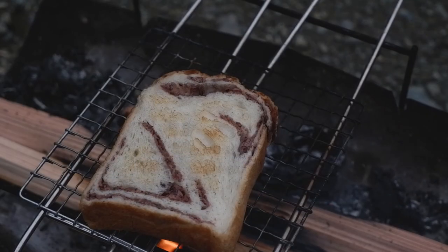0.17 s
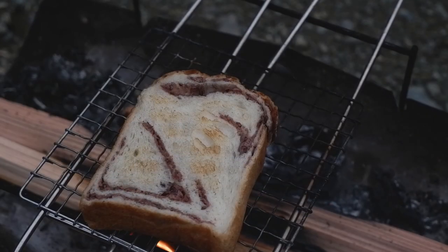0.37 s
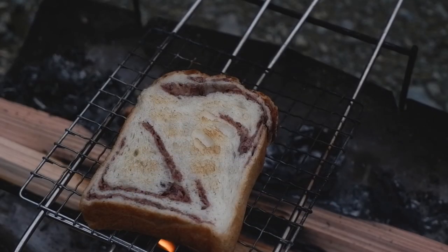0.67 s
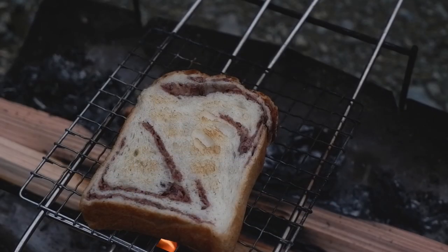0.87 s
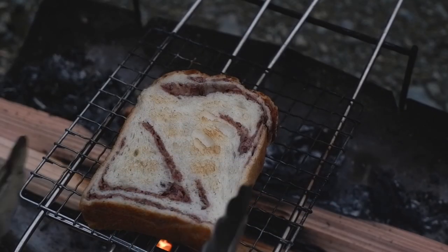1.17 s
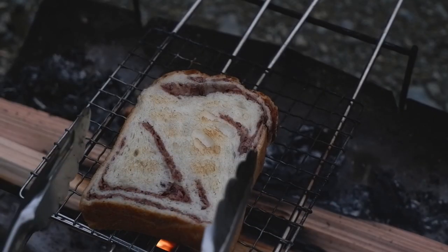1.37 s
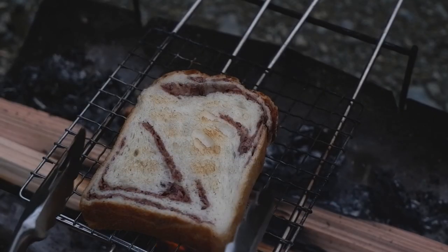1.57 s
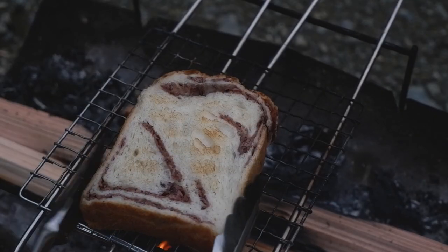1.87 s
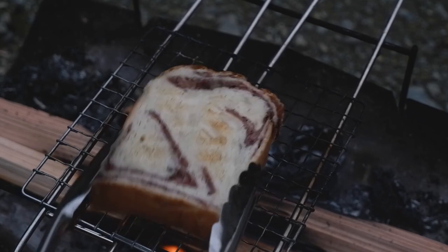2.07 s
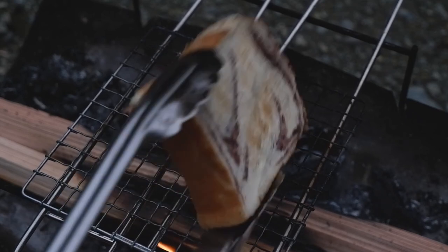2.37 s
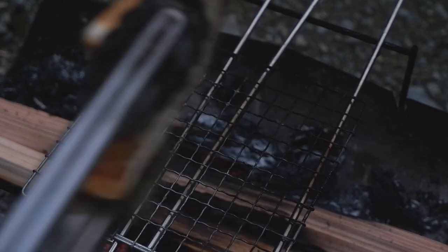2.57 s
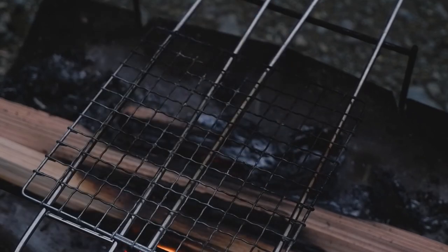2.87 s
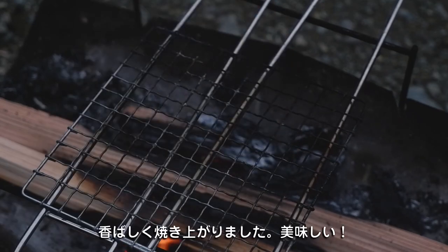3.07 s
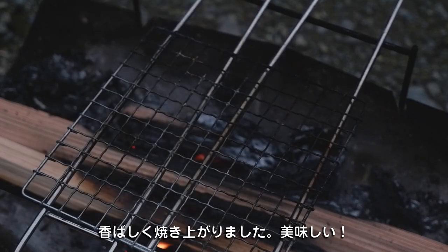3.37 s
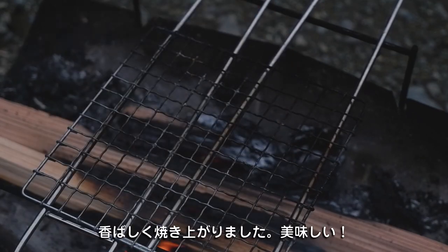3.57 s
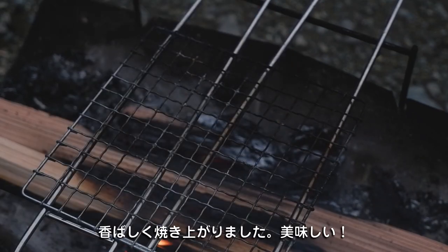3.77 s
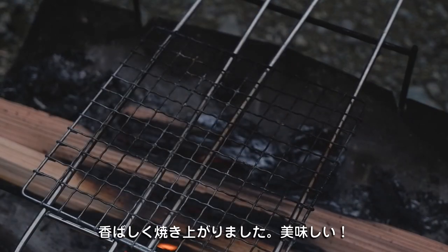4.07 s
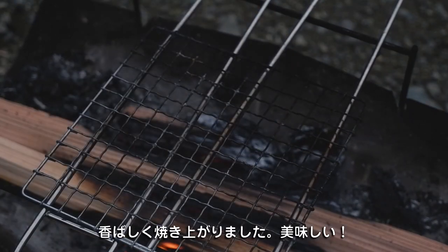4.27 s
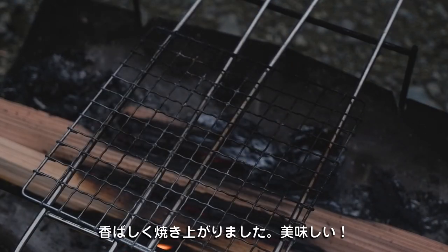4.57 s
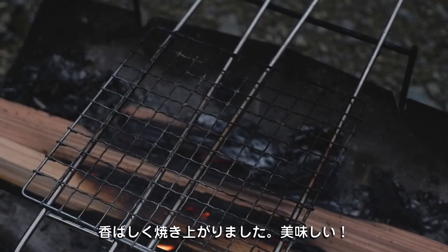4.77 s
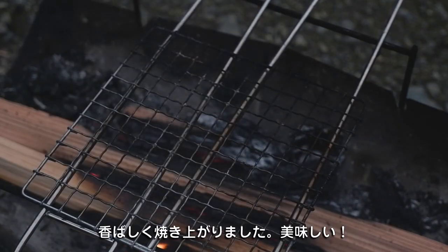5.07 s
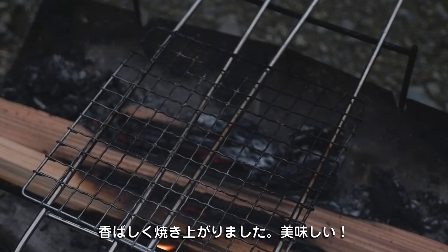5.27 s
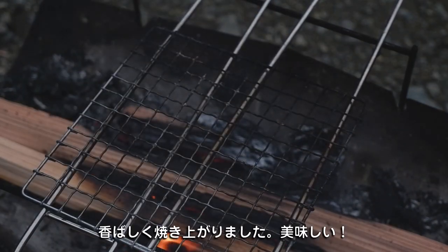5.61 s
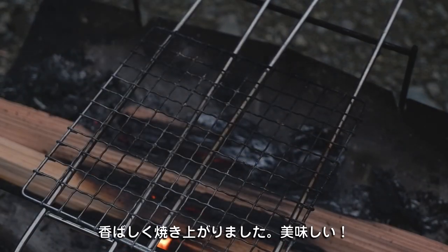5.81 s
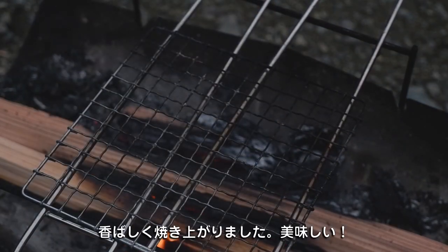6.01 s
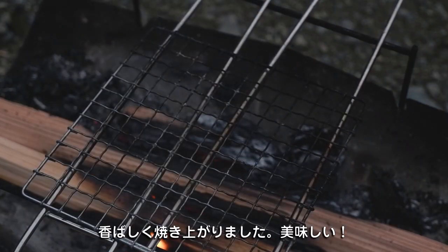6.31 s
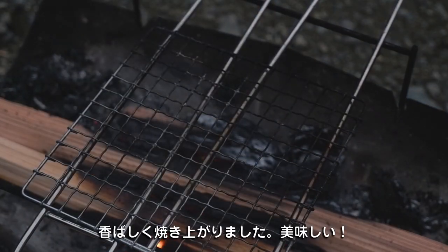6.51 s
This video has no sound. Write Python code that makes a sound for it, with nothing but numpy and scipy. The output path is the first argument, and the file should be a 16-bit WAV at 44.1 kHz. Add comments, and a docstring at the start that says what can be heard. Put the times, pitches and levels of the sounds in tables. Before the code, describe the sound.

Beside a campfire grill, metal tongs rattle lightly, one clink standing out, then leave a quiet gap with soft wood pops. A hard snap, a faint drag of bread crust on the grid and two more snaps come in the middle. The rest is sparse: muffled pops, dry ticks and faint metal taps. Distant water murmurs steadily beneath, with short outdoor echoes and slight hiss.

```python
"""A charcoal fire outdoors, bread toasting over it: three hard cracks, small ember ticks, soft pops in the wood.
Steel tongs clink and their arms rub, noise driving the modes of the steel; the crust drags over wire mesh.
Far off a stream murmurs, built from patchy noise bands. Cracks, ticks and clinks bring short ground echoes.
The stereo microphone's gain ducks after loud peaks, its input saturates and its band is limited."""
import sys
import numpy as np
from scipy import signal
from scipy.fft import rfft, irfft, next_fast_len
from scipy.io import wavfile
from scipy.ndimage import uniform_filter1d, map_coordinates

SR = 44100
rng = np.random.default_rng(int(sys.argv[2]) if len(sys.argv) > 2 else 0)


def dump(signal):
    """Clip the signal to [-1, 1] and save it as 16-bit WAV at the path in sys.argv[1]."""
    limited = np.clip(np.atleast_2d(signal).T, -1, 1)
    pcm = np.round(limited * 32767).astype(np.int16)
    wavfile.write(sys.argv[1], SR, pcm)


N = 293118


def amp(db):
    """Decibels to gain."""
    return 10 ** (np.asarray(db) / 20)


def unit(x):
    """Scaled to rms 1."""
    return x / np.sqrt(np.mean(x ** 2) + 1e-20)


def along(points, hz):
    """(Hz, value) points read on a log frequency axis."""
    f, v = np.transpose(points)
    return np.interp(np.log(hz + 1), np.log(f + 1), v)


def curves(rows):
    """One value per sample for each column after the time."""
    s, *columns = np.transpose(rows)
    return [np.interp(np.arange(N) / SR, s, column) for column in columns]


def drift(rate):
    """A smooth random curve, rate knots a second."""
    knots = rng.standard_normal(int(N * rate / SR) + 4)
    return map_coordinates(knots, [np.arange(N) * rate / SR])


def swell(t, rise_ms, fall_ms):
    """An exponential rise and fall that peaks at 1 when t = 0; both times are time constants."""
    return np.exp(np.where(t < 0, 1000 * t / rise_ms, -1000 * t / fall_ms))


def filtered(x, response):
    """x times a complex response of frequency."""
    m = next_fast_len(x.shape[-1] + 8192)
    return irfft(rfft(x, m) * response(np.fft.rfftfreq(m, 1 / SR)), m)[..., :x.shape[-1]]


def body(modes):
    """Causal response of parallel resonances (Hz, width Hz, dB) with alternating signs."""
    def response(f):
        total = 0
        for k, (centre, width, db) in enumerate(modes):
            damping = 1j * f * width
            total = total + (-1) ** k * amp(db) * damping / (centre * centre - f * f + damping)
        return total
    return response


def add(track, s, sound, start=0):
    """Mixes in a sound whose first sample lies start seconds from s."""
    i = round((s + start) * SR)
    part = track[..., max(i, 0):][..., :sound.shape[-1] + min(i, 0)]
    part += sound[..., max(-i, 0):][..., :part.shape[-1]]


def rush(spectrum, patchy_db, size):
    """Unrelated left and right noise of rms 1 with shared patches of random gain, smoothed over size frames."""
    z = signal.stft(rng.standard_normal((2, N)), nperseg=1024)[2]
    field = uniform_filter1d(rng.standard_normal(z.shape[1:]), size=3, axis=0)
    field = uniform_filter1d(field, size=size, axis=1)
    pair = signal.istft(z * amp(patchy_db * unit(field)), nperseg=1024)[1][:, :N]
    return unit(filtered(pair, lambda hz: amp(along(spectrum, hz))))


# echoes off stones and gear: (frequency [Hz], time to fall 60 dB [s])
GROUND = [(300, 0.053), (2500, 0.098), (8000, 0.12), (15000, 0.088)]


def echoes():
    """A fresh stereo noise tail, 8.1 ms behind the direct sound; each frequency dies at its own speed."""
    hz, t, z = signal.stft(rng.standard_normal((2, SR // 4)), SR, nperseg=256)
    fading = z * amp(-60 * t / along(GROUND, hz)[:, None])
    tail = signal.istft(fading, SR, nperseg=256)[1]
    return np.pad(tail / np.linalg.norm(tail[0]), ((0, 0), (round(0.0081 * SR), 0)))


def outdoors(sound, wet_db):
    """The direct sound followed by its echoes."""
    wet = amp(wet_db) * signal.fftconvolve(sound, echoes(), axes=1)
    return wet + np.pad(sound, ((0, 0), (0, wet.shape[1] - sound.shape[1])))


# far stream over time: (time [s], rms level of the murmur [dB], rms level of the rumble [dB])
STREAM = [(0.0, -58.5, -65.5), (0.37, -58, -64.5), (0.7, -60.5, -62.5), (1.05, -59, -61), (1.61, -59, -67),
          (2.41, -57, -66), (2.78, -64, -66), (3.24, -56, -61.5), (3.46, -59.5, -64), (3.91, -56.5, -65),
          (4.33, -62.5, -61), (4.46, -60, -63), (5.54, -57.5, -63), (5.83, -59, -69.5), (6.65, -59.5, -60)]
# colours of the water's layers, each made rms 1 afterwards: (frequency [Hz], relative level [dB])
RUMBLE = [(18, -51), (30, -72.5), (75, -19), (144, -0.5), (225, 1), (275, 1), (335, 1.5), (367, 0),
          (700, -10.5), (910, -32), (1540, -120)]
MURMUR = [(320, -12), (550, -5.5), (706, -4), (875, -4), (1030, -0.5), (1170, -3), (1330, -15), (1600, -28),
          (2080, -45), (3520, -120)]
SPLASH = [(820, -12), (1400, -4), (1560, -5.5), (1860, -5.5), (2110, -6), (3020, -6), (3450, -7.5),
          (4140, -12), (6000, -17.5), (7800, -20.5), (13200, -120)]
HISS = [(2650, -50.5), (4500, -26.5), (8110, -6), (8600, -6.5), (9820, -6.5), (15100, -5.5), (16000, -8.5)]  # the input hiss in record() has this colour too
SPLASH_DB, DRIFT_DB = -60, 0.57  # steady level of the splash; depth of its slow drift
HISS_DB = -71
RUMBLE_PATCHY_DB, MURMUR_PATCHY_DB = 5.5, 4.3  # depth of the lumps in the water


def stream():
    """Far water: lumpy rumble, a hollow murmur near 1 kHz and splash, over a smoother hiss."""
    murmur_db, rumble_db = curves(STREAM)
    splash_db = SPLASH_DB + DRIFT_DB * drift(2.97)
    rumble = amp(rumble_db) * rush(RUMBLE, patchy_db=RUMBLE_PATCHY_DB, size=6)
    murmur = amp(murmur_db) * rush(MURMUR, patchy_db=MURMUR_PATCHY_DB, size=4)
    splash = amp(splash_db) * rush(SPLASH, patchy_db=4.0, size=4)
    hiss = amp(HISS_DB) * rush(HISS, patchy_db=-1.0, size=4)
    return rumble + murmur + splash + hiss


# colour of crust on mesh, made rms 1 afterwards: (frequency [Hz], relative level [dB])
CRUST = [(880, -36), (1500, -11), (1850, -5), (3120, -3), (7920, -16.5), (13800, -17), (16000, -16)]
SCRAPE_S, SCRAPE_DB, SCRAPE_RISE_MS, SCRAPE_HOLD_S, SCRAPE_FALL_MS = 2.188, -58.5, 28, 0.14, 60


def lift():
    """The crust drags once over the wire mesh in uneven grains of noise."""
    t = np.arange(N) / SR - SCRAPE_S
    held_t = t - np.clip(t, 0, SCRAPE_HOLD_S)  # stays at the peak during the hold
    stroke = swell(held_t, SCRAPE_RISE_MS, SCRAPE_FALL_MS)
    grains = amp(3.7 * unit(uniform_filter1d(rng.standard_normal(N), size=300)))
    return amp(SCRAPE_DB) * stroke * unit(grains * rush(CRUST, patchy_db=-1.5, size=2))


# modes of the tongs' steel, before grip damping; tongs() plays them too:
# (frequency [Hz], width [Hz], relative level [dB])
STEEL = [(2400, 37, -4), (2780, 50, -12), (3250, 110, -2), (3830, 39, -2), (4120, 35, -4), (4390, 62, -7),
         (4660, 50, -7), (4870, 40, -5), (5290, 45, -9), (5500, 58, -8), (5890, 30, -9), (6150, 40, -7),
         (6530, 33, -8), (6920, 83, -7), (7260, 52, -9), (7500, 77, -10), (8210, 34, -9), (8410, 79, -11),
         (8900, 60, -14)]
SLIDE_DB, SLIDE_END_S, SLIDE_FALL_MS = -61, 0.42, 69  # the arms rub until the grip settles
SLIDE_GRIT_DB = 5  # unevenness of the rubbing


def rubbing():
    """Early on the arms slide on each other: uneven grit through the damped steel."""
    stroke = swell(np.maximum(np.arange(N) / SR - SLIDE_END_S, 0), 1, SLIDE_FALL_MS)
    hz, width, level = np.transpose(STEEL)
    unevenness = unit(uniform_filter1d(rng.standard_normal(N), size=400))
    grit = amp(SLIDE_GRIT_DB * unevenness) * rng.standard_normal((2, N))
    modes = body(np.transpose([hz, width + 90, level]))
    steel = lambda f: modes(f) / (1 + (2100 / (f + 1)) ** 8) / (1 + (f / 7000) ** 4)
    return amp(SLIDE_DB) * stroke * unit(filtered(grit, steel))


# tongs clinks: (time [s], level of the loudest 3 ms before echoes [dB], tip ring [dB], treble [dB],
# favoured pitch [Hz], fall of the noise burst [ms])
CLINKS = [(0.0265, -40.5, -1, 7, 5000, 2.7), (0.073, -44.5, 13, 5.5, 6300, 12),
          (0.143, -34.5, 16, 11, 4150, 8.7), (0.161, -43.5, 17, 9, 4150, 4.5),
          (.187, -40, 6, -6, 4170, 2.9), (0.2128, -48.5, 16, 1, 3900, 6.3), (.237, -47, 14, 8, 4000, 3.9),
          (0.285, -52, 15, -5, 3570, 3.3), (0.3178, -33, 12, -0.5, 2970, 6.4),
          (0.357, -47, 22, 0, 2900, 2.8), (0.378, -44.5, -5, 1, 3230, 3.8),
          (0.392, -22, 3.5, -0.5, 3330, 4.5), (0.4082, -46, 17, -13, 3250, 3.4),
          (0.6035, -40, -12, -4, 3250, 1.7), (2.1402, -50, 7, 7.5, 5000, 2.9),
          (4.36, -46, 10, 2.5, 5150, 7.1), (4.605, -48, -3, 5, 3500, 15), (4.6896, -44, 9, 9, 4120, 16),
          (4.708, -52, 1, -4, 3960, 5), (4.83, -49.5, 18.5, 6.5, 4200, 12),
          (5.273, -43, -10, -3, 4000, 9.5), (5.294, -51.5, -1, 10, 3250, 9.7)]
BURST_RISE_MS, EDGE_DB = 3.9, -37.5  # rise of the noise burst; a clink's sharp edge relative to the treble


def tongs():
    """Each clink is a short noise burst that drives the steel's modes, most near its favoured pitch."""
    out, t = np.zeros((2, N)), np.arange(SR // 6) / SR - .02
    hz, width, level = np.transpose(STEEL)
    for s, db, tip_db, treble_db, near_hz, fall_ms in CLINKS:
        favour = -11 * np.tanh(np.abs(np.log(hz / near_hz)) / 0.065)
        tilt = np.select([hz < 2600, hz > 5000], [tip_db, treble_db])
        scatter = rng.normal(0, 2.5, hz.shape)
        size = level + favour + tilt + scatter
        envelope = swell(t, BURST_RISE_MS, fall_ms) + 0.6 * swell(t, 0.75, 0.13)  # a sharp core inside the burst
        noise = envelope * rng.standard_normal(len(t))
        # a random delay between left and right widens the clink, in samples
        shift = round(rng.choice([-1, 1]) * rng.uniform(50, 110))
        burst = np.array([noise, np.roll(noise, shift)])
        held = np.where(hz < 2600, 28, width + 45)  # the grip damps all but the tip
        ring = filtered(burst, body(np.transpose([hz, held, size])))
        clank = filtered(burst, body(np.transpose([hz, 6 * width, size - 9])))
        sound = filtered(ring + clank, lambda f: 1 / (1 + (2100 / (f + 1)) ** 8) / (1 + (f / 9000) ** 6))
        edge = filtered(burst, body([(9350, 640, 10), (13300, 1200, 2.0)]))  # the clink's sharp edge
        sound = sound + amp(treble_db + EDGE_DB) * edge
        power = uniform_filter1d(np.mean(sound ** 2, axis=0), size=130)
        sound = sound / np.sqrt(np.max(power))
        add(out, s, amp(db) * outdoors(sound, wet_db=-17), t[0] + 0.0015)
    return out


# soft hollow pops in the log: (time [s], level before the envelope [dB], pitch [Hz])
POPS = [(0.284, -32.5, 1050), (0.427, -29, 1070), (0.524, -34, 1020), (1.074, -32, 980), (1.278, -38, 1084),
        (3.035, -37, 967), (2.338, -35.5, 695), (3.067, -36, 760), (3.519, -31, 1070), (3.652, -34.5, 905),
        (3.754, -34.5, 990), (3.783, -37, 1000), (3.839, -35.5, 1020), (3.944, -34, 965), (4.113, -36, 883),
        (4.496, -34, 1020), (4.897, -37.5, 990)]
FAINT_POP_DB, FAINT_POP_HZ = -38.5, 950  # centre level and base pitch of more pops at random times


def pops(count=18):
    """Gas pockets burst inside the wood: soft, fast-dying sines, their phase unequal left and right."""
    out, t = np.zeros((2, N)), np.arange(SR // 10) / SR
    when, size, tone = rng.random((count, 3)).T
    faint_db = FAINT_POP_DB + 6 * (size - .5)
    faint_hz = FAINT_POP_HZ * (0.78 + 0.426 * tone)
    faint = np.transpose([when * N / SR, faint_db, faint_hz])
    for s, db, hz in [*POPS, *faint]:
        phase = 2 * np.pi * hz * t + rng.uniform(0, 2.2, (2, 1))
        onset = 1 - np.exp(-t / 0.0028)
        add(out, s, amp(db - 60 * t / 0.019) * onset * np.sin(phase))
    return out


# ember ticks: (time [s], peak level before echoes [dB], pitch [Hz], fall [ms])
TICKS = [(0.525, -44.5, 2780, 7.6), (1.5322, -18.5, 3560, 1.6), (1.811, -53, 2270, 5.1),
         (1.876, -49, 2510, 4), (2.005, -54, 5240, 6.2), (2.5294, -54, 5430, 6), (2.897, -51, 6700, 1.3),
         (3.177, -48.5, 3230, 30), (3.65, -40.5, 2920, 5.9), (4.134, -46.5, 2700, 8),
         (4.896, -50, 2640, 4.4), (5.339, -57, 6100, 20), (6.163, -53.5, 7900, 4.3),
         (6.272, -56.5, 8260, 6), (6.389, -56, 8300, 4), (6.587, -40, 5850, 9.7)]
TICK_RISE_MS, TICK_WIDTH_HZ = 3.8, 4300  # longest rise; width of a 1 ms tick, longer ones are narrower


def embers():
    """Small ticks: a puff of noise in one short, steep resonance."""
    out, t = np.zeros((2, N)), np.arange(SR // 12) / SR - .01
    for s, db, hz, fall_ms in TICKS:
        puff = swell(t, min(TICK_RISE_MS, fall_ms), fall_ms) * rng.standard_normal((2, len(t)))
        resonance = body([(hz, TICK_WIDTH_HZ / np.sqrt(fall_ms), 0)])
        tick = filtered(puff, lambda f: resonance(f) ** 2)
        add(out, s, amp(db) * outdoors(tick / np.abs(tick).max(), wet_db=-13.5), t[0] + 0.0018)
    return out


# cracks of the fire: (time [s], gain [dB], thud [dB], log knock [dB], treble [dB], top [dB],
# knock phase between channels [rad], right channel late by [ms])
CRACKS = [(1.5375, -3.5, -7, 2, -4.5, -19.5, 1.6, -0.42), (2.6243, 12, -5, -1, -11.5, -22, 1.6, 0.121),
          (2.8051, -0.5, -9, -1.5, -5, -9.5, 3.1, 0.459)]
# resonances of the burning log, the coals and the splinters: (frequency [Hz], width [Hz], level [dB])
LOG = [(650, 214, 2), (1010, 280, 9)]
COAL = [(1720, 200, -1), (2370, 480, 0.5), (3310, 590, 1), (4850, 370, -4.5)]
SPLINTER = [(5550, 250, 5), (6460, 590, 2), (9140, 910, -7.5), (11400, 710, -10)]
DEEP_DB, DEEP_GROWS = -13, .7  # deepest part of a crack's thud; dB more for each dB of crack


def cracks():
    """A hard snap inside a short soft-edged puff of noise knocks log, coal and splinters."""
    out, t = np.zeros((2, N)), np.arange(SR // 16) / SR - .02
    half = np.array([[.5], [-.5]])  # splits a phase or delay between left and right
    snap = np.exp(-(t / .00003) ** 2)
    for s, db, thud_db, knock_db, treble_db, top_db, turn, late_ms in CRACKS:
        puff = (np.exp(-(t / 0.0032) ** 2) + 0.36 * swell(t, 6.0, 6.5)) * rng.standard_normal(len(t))
        knock = lambda f: amp(knock_db) * body(LOG)(f) * np.exp(1j * turn * half)
        thud = lambda f: amp(thud_db) * body([(60, 200, DEEP_DB + DEEP_GROWS * db), (240, 200, 0)])(f)
        lag = lambda f: np.exp(2j * np.pi * f * half * late_ms / 1000)
        shards = lambda f: (body(COAL)(f) + amp(treble_db) * body(SPLINTER)(f)) * lag(f)
        top = lambda f: amp(top_db) * body([(14600, 2500, 0)])(f) ** 2
        low = filtered(snap + 0.046 * puff, knock) + filtered(snap, thud)
        high = filtered(snap + 0.13 * puff, lambda f: shards(f) + top(f))
        add(out, s, amp(db) * outdoors(low + high, wet_db=-21), t[0])
    return out


def scene():
    """The far stream, the bread, the tongs and the fire together."""
    return stream() + lift() + rubbing() + tongs() + pops() + embers() + cracks()


TOP_HZ = 15850  # band limit


def record(dry):
    """The microphone's gain ducks after loud peaks and recovers slowly; its input saturates, its band is limited."""
    power = uniform_filter1d(np.mean(dry ** 2, axis=0), size=256)
    level_db = 20 * np.log10(np.abs(power) ** .5 + 1e-9)
    over_db = np.maximum(level_db + 22, 0)
    t = np.arange(SR) / SR
    release = np.clip(t / 0.0015, 0, 1) * np.exp(-(t / 0.26) ** 2)  # too slow to catch the snap itself
    duck_db = 0.0016 * signal.fftconvolve(over_db, release)[:N]
    own_hiss = amp(-73.5) * rush(HISS, patchy_db=6.5, size=4)  # the converter's own hiss is never ducked
    ducked = dry * amp(-duck_db) + own_hiss
    rounded = ducked / (1 + np.abs(ducked / .93) ** 6) ** (1 / 6)  # the input stage saturates
    # the deepest bass is dropped and nothing passes above the band limit
    return filtered(rounded, lambda hz: (hz < TOP_HZ) / (1 + (38 / (hz + 1)) ** 3))


dry = scene()
out = record(dry)
dump(out)
```